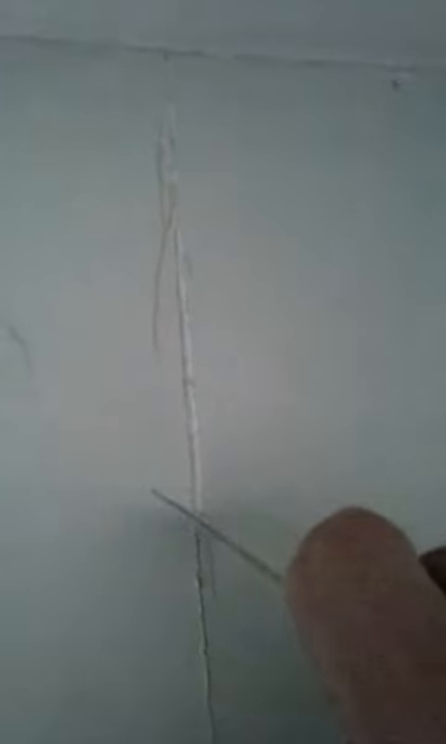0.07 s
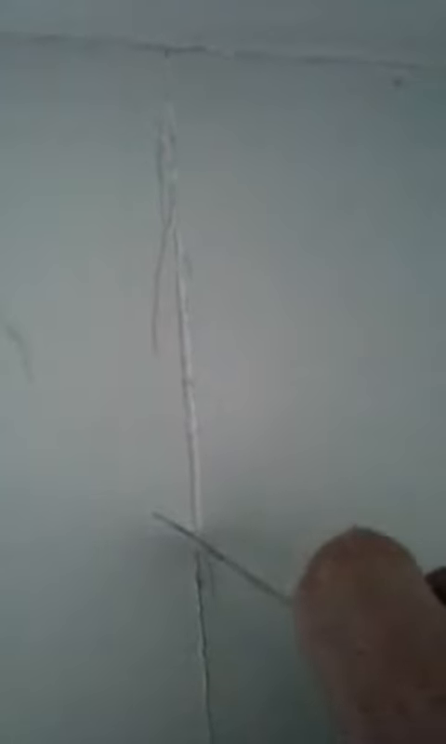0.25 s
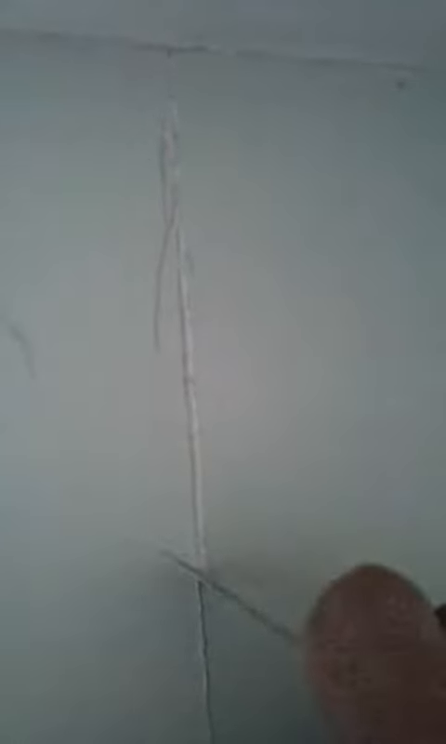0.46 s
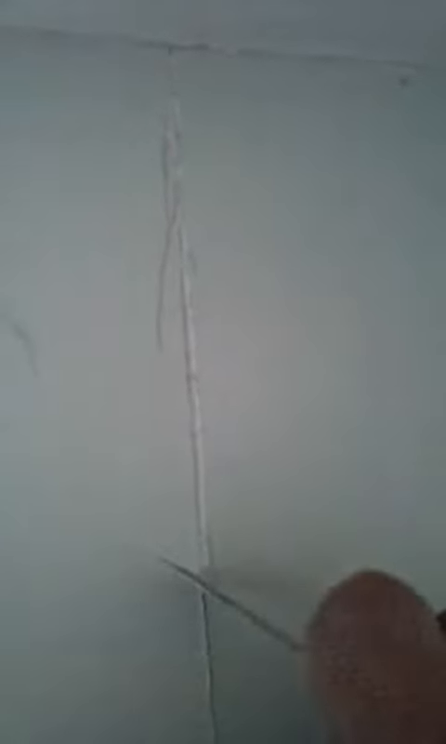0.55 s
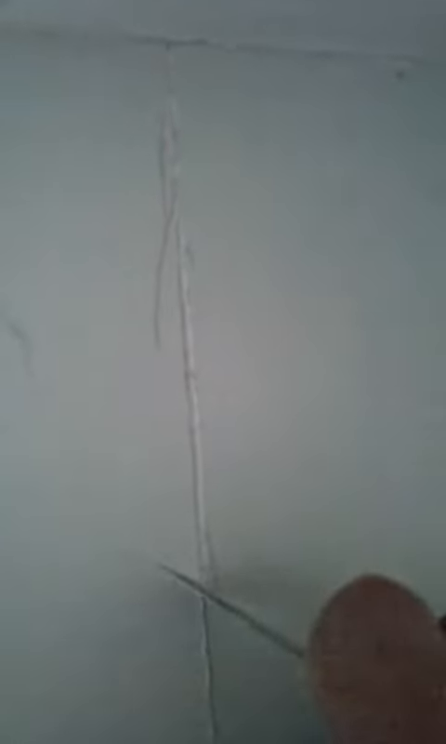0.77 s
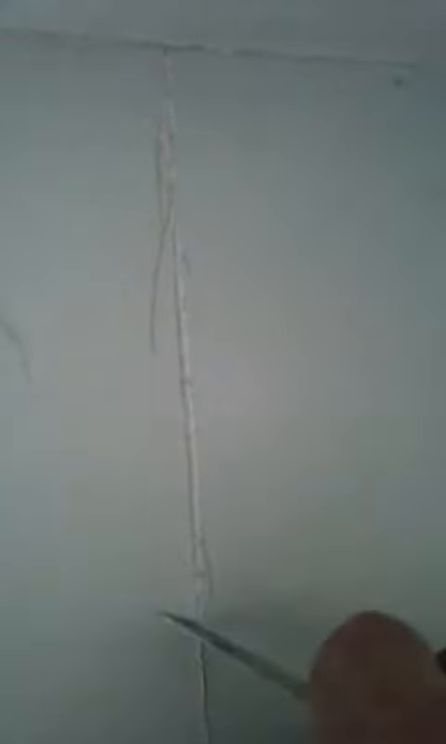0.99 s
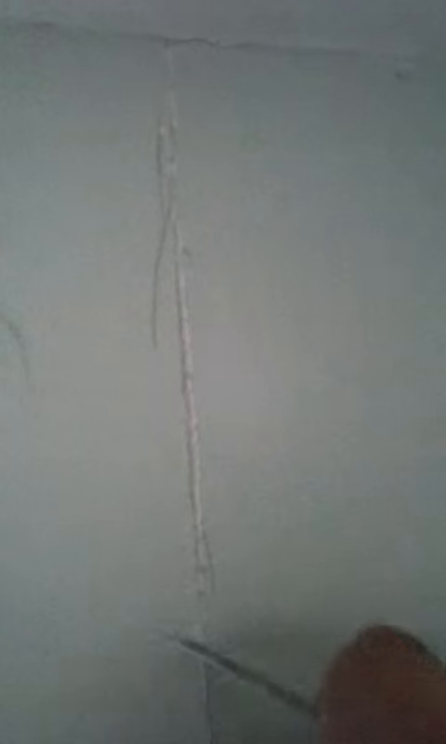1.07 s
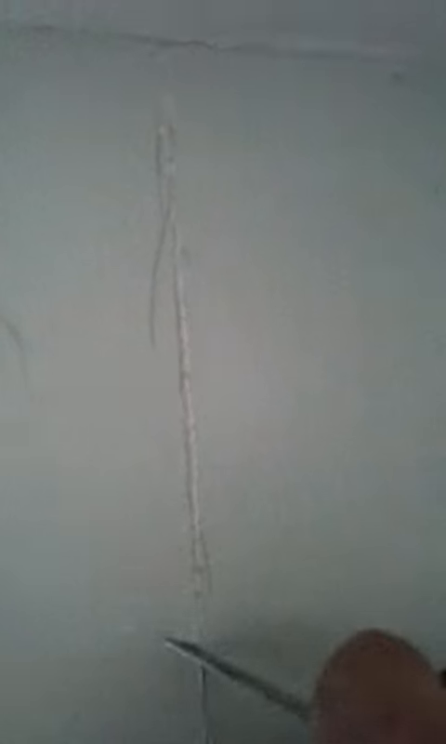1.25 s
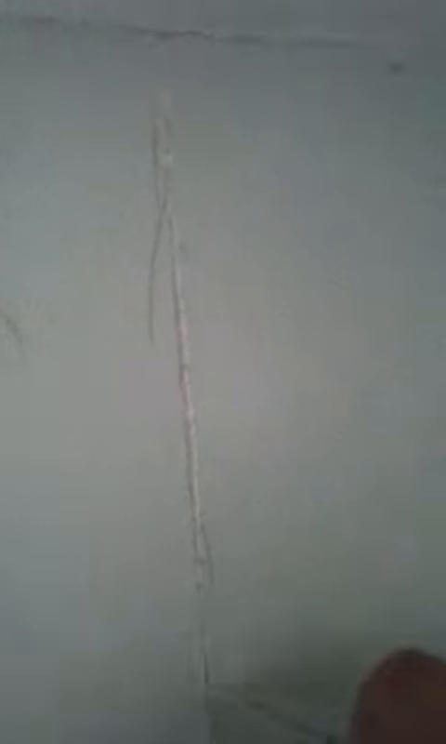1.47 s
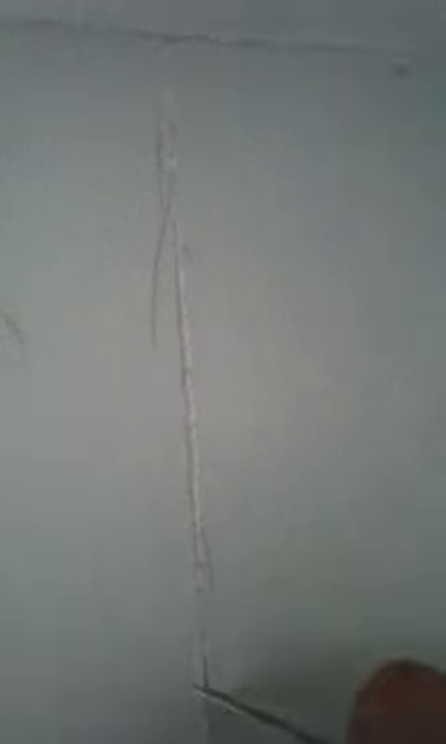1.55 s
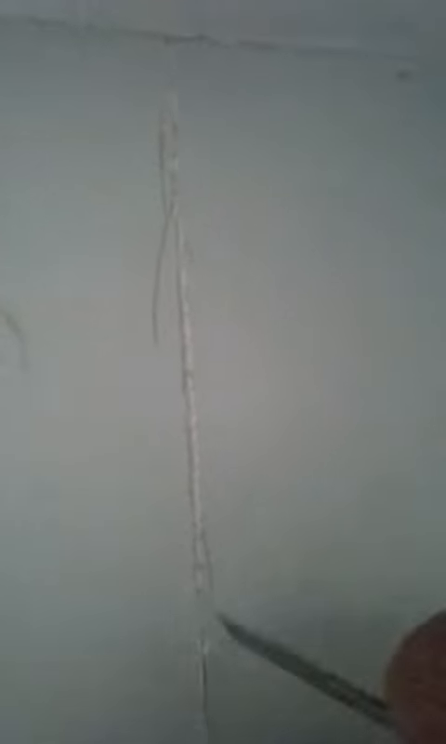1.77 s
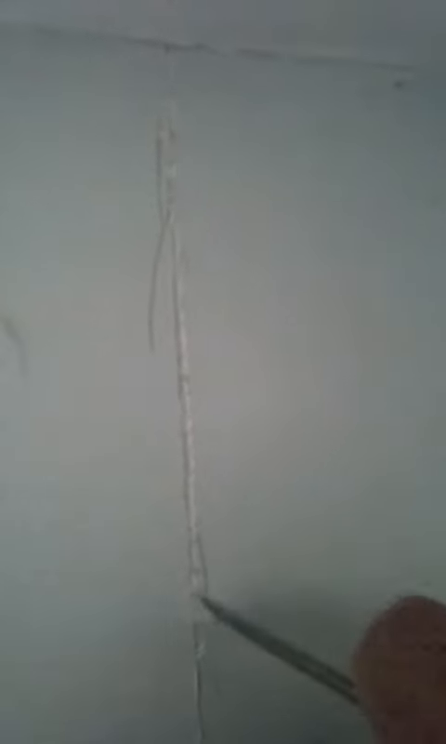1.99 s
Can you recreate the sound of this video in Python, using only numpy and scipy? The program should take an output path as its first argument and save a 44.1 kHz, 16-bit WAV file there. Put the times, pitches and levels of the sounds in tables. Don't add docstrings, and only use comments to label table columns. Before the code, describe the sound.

A steel putty knife gouges a plaster wall crack in short, gritty, snapping bursts

```python
import sys
import numpy as np
from scipy import signal
from scipy.fft import rfft, irfft
from scipy.io import wavfile
from scipy.ndimage import uniform_filter1d

SR = 44100
rng = np.random.default_rng(int(sys.argv[2]) if len(sys.argv) > 2 else 0)


def unload_wav(signal):
    wavfile.write(
        sys.argv[1],
        SR,
        np.round(np.clip(np.atleast_2d(signal).T, -1, 1) * 32767).astype(np.int16),
    )


def magnitude_from_level(level_db):
    exponent = np.asarray(level_db, float) / 20
    return 10 ** exponent


N = 88200

# [f/Hz, density/dB per Hz]
AIR_SPECTRUM = [(40, 8.5), (110, 4.5), (300, -11.5), (1000, -12.5), (4000, -24.5), (6500, -25),
                (10000, -10.5), (16000, -15)]
# [t/s, level/dB]
AIR_LEVEL = [(0, -66.5), (.3, -57), (1.5, -56), (2, -59.5)]
# [f/Hz, width/Hz, level/dB]
DRONE_MODES = [(373, 60, 2), (890, 97, 0.5), (1100, 80, -7)]
# [t/s, level/dB]
DRONE_LEVEL = [(1.0, -90), (1.5, -59.5), (2, -70)]
# [t/s, level/dB, f/Hz]
KNOCKS = [
    (1.40, -53, 925),
    (1.57, -53.5, 904),
    (1.675, -53, 886),
    (1.775, -54.5, 880),
    (1.872, -58.5, 890),
    (1.95, -49.5, 1100),
]
# [delay t/s, level/dB]
SLAPS = [(0.0137, -11.5), (0.0178, -23), (.029, -25), (.038, -20)]
# [f/Hz, level/dB]
SLAP_COLOUR = [(300, -1), (2400, 0), (5000, -2.5), (8500, -1), (12000, -3.5)]
# [f/Hz, t60/s]
TAIL_DECAY = [(80, 1.0), (210, 0.27), (560, 0.96), (1470, 0.69), (3880, 0.56), (7000, 0.44), (10200, 0.32),
              (15000, 0.11)]
# [f/Hz, level/dB]
TAIL_COLOUR = [(60, 5.5), (200, 6.5), (440, 0), (600, -2.5), (1000, -3), (3500, -3), (6000, 1), (12000, -1)]
# [t/s, level/dB]
BOOMS = [
    (.03, -63),
    (0.247, -42.5),
    (0.457, -38.5),
    (0.589, -46),
    (0.754, -81),
    (0.958, -38),
    (1.165, -31),
    (1.502, -36.5),
]
# [start t/s, length t/s, level/dB, edge ring f/Hz, wall level/dB]
DRAGS = [
    (0.16, 0.012, -49.5, 3180, -37),
    (0.404, 0.027, -55, 2974, -3),
    (0.901, .03, -39.5, 2900, -27.5),
    (1.468, .10, -33.5, 2940, -12),
]
# [t/s, strength level/dB, length t/s, loudest blade ring f/Hz, blade and wall level/dB]
BREAKS = [(.1800, -24.5, 0.009, 2940, 8), (.1840, -17.5, 0.0074, 3120, 1),
          (0.229, -14.5, 0.0049, 3110, 5.5), (0.242, -23, 0.011, 2760, 1.5),
          (0.373, -37, 0.0015, 6460, -12), (.4290, 1, 0.006, 4444, 2), (0.4557, 1.5, 0.0064, 5516, -1),
          (0.4612, 3.5, 0.0015, 4200, -1), (0.5804, 4, .008, 4200, -0.5), (0.7499, -6.5, 0.0051, 4230, 3.5),
          (0.9047, -22, 0.0025, 3050, 3), (0.912, -23, 0.011, 2670, 3.5), (0.9361, -11, 0.0036, 3150, 8),
          (0.9586, 0, 0.0084, 2610, 3.5), (1.1239, -6.5, 0.0062, 2570, 3.5), (1.1637, 5, 0.0066, 2560, 4),
          (1.1684, 1, 0.0048, 4100, -1.5), (1.483, -33, 0.0032, 1550, 12), (1.489, -29, 0.0037, 3000, 3.5),
          (1.6966, -34, 0.00077, 5120, -13.5), (1.7185, -36, .005, 1844, 12),
          (1.8566, -41, 0.0018, 2580, -9)]
# [f/Hz, level/dB]
GRIT_COLOUR = [(150, -37.5), (600, -29.5), (2000, -10.5), (6000, -8.5), (10000, -9.5), (13000, -13),
               (16000, 2)]
# [f/Hz, width/Hz, level/dB]
BLADE_MODES = [(801, 580, -6.5), (1690, 190, -8.5), (2556, 160, -4.5), (3150, 110, -9), (4200, 127, -8),
               (5462, 125, -7), (7170, 1000, -1.5)]
# [f/Hz, width/Hz, level/dB]
WALL_MODES = [(98.2, 27, -7), (200.7, 31, -12), (353, 66, 1)]
# [f/Hz, width/Hz, level/dB]
SHEET_LOW = [(185, 71, -29.5), (328, 49, -24), (443.4, 67, -26.5)]
# [f/Hz, width/Hz, level/dB]
SHEET_HIGH = [(900, 250, -21), (1150, 200, -22), (1700, 400, -20), (2420, 220, -13), (3400, 500, -22),
              (5500, 400, -12)]


def read(points, x, warp=np.log1p):
    at, value = np.transpose(points)
    return np.interp(warp(x), warp(at), value)


def evened(x):
    return x / np.sqrt(np.mean(x ** 2) + 1e-20)


def add(mix, s, sound):
    part = mix[round(s * SR):][:len(sound)]
    part += sound[:len(part)]


def resonate(x, hz, width):
    r = np.exp(-np.pi * width / SR)
    pole = r * np.exp(2j * np.pi * hz / SR)
    return 2 * signal.lfilter([1 - r], [1, -pole], x).real


def colour(x, points):
    gain = magnitude_from_level(read(points, np.fft.rfftfreq(len(x), 1 / SR)))
    return irfft(rfft(x) * gain, len(x))


def clicks(draws, per_s, spread_db):
    happens = draws[0] < per_s / SR
    size = magnitude_from_level(-spread_db * np.log(np.clip(draws[1], .01, 1)))
    return happens * size * np.sign(draws[2] - .5)


def modes(x, table, bends=1, luck_db=0):
    hz, width, db = np.transpose(table)
    out = 0
    for k, (f, w, level_db) in enumerate(zip(hz * bends, width, db + luck_db)):
        equal_energy = np.sqrt(SR / w / 4)
        out = out + (-1) ** k * magnitude_from_level(level_db) * resonate(x, f, w) * equal_energy
    return out


def dust():
    clumps = evened(uniform_filter1d(rng.standard_normal(N), size=250))
    grains = clicks(rng.random((3, N)), per_s=3500, spread_db=2.2) * magnitude_from_level(3 * clumps)
    high_pass = signal.butter(4, 7500, "high", fs=SR, output="sos")
    return evened(signal.sosfilt(high_pass, grains))


def drone():
    level_db = read(DRONE_LEVEL, np.arange(N) / SR, warp=np.asarray)
    hum = modes(modes(rng.standard_normal(N), DRONE_MODES), DRONE_MODES)
    return magnitude_from_level(level_db) * evened(hum)


def air():
    hush = evened(colour(rng.standard_normal(N), AIR_SPECTRUM))
    level_db = read(AIR_LEVEL, np.arange(N) / SR, warp=np.asarray)
    return magnitude_from_level(level_db) * (hush + dust()) + drone()


def knocks():
    length_s, width_hz = .07, 80
    out, t = np.zeros(N), np.arange(0, length_s, 1 / SR)
    noises = rng.standard_normal((len(KNOCKS), 8192))
    for (s, db, hz), noise in zip(KNOCKS, noises):
        ring = resonate(resonate(noise, hz, width_hz), hz, width_hz)
        ring = evened(ring[2048:][:len(t)])
        add(out, s, magnitude_from_level(db - 11) * np.sin(np.pi * t / length_s) * ring)
    return out


def room(x):
    tail_db, build_s = -9.5, 0.0069
    hz, t, z = signal.stft(rng.standard_normal(SR), SR, nperseg=256)
    fade = magnitude_from_level(-60 * t / read(TAIL_DECAY, hz)[:, None])
    tail = signal.istft(z * fade, SR, nperseg=256)[1][:SR]
    build = 1 - np.exp(-(np.arange(SR) / SR / build_s) ** 2)
    tail = colour(tail * build, TAIL_COLOUR)
    return signal.fftconvolve(x, magnitude_from_level(tail_db) * tail / np.linalg.norm(tail))[:N]


def slaps(x):
    scatter_s = .0016
    t = np.arange(256) / SR
    taps = np.zeros(4096)
    smears = rng.standard_normal((len(SLAPS), 256)) * t * np.exp(-t / scatter_s * 2)
    for (s, db), smear in zip(SLAPS, smears):
        add(taps, s, magnitude_from_level(db) * smear / np.linalg.norm(smear))
    return signal.oaconvolve(x, colour(taps, SLAP_COLOUR))[:N]


def booms():
    from_hz, panel_hz, width_hz = 198.3, 100.3, 28
    glide_s, rise_s, t60_s = .02, 0.024, 0.23
    out, t = np.zeros(N), np.arange(SR // 3) / SR
    pitch = panel_hz + (from_hz - panel_hz) * np.exp(-t / glide_s)
    tone = np.sin(2 * np.pi * np.cumsum(pitch) / SR)
    swell = 1 - np.exp(-(t / rise_s) ** 2)
    for (s, db), noise in zip(BOOMS, rng.standard_normal((len(BOOMS), len(t)))):
        fuzz = evened(resonate(noise, panel_hz * 0.79, width_hz * 3))
        add(out, s, magnitude_from_level(db + 7 - 60 * t / t60_s) * swell * (tone + 0.81 * fuzz))
    return out


def drags():
    ring_db, ring_width_hz, peak_at = -4.5, 660, 0.39
    out = np.zeros(N)
    draws = rng.random((len(DRAGS), 3, 8192))
    for (s, length, db, hz, wall_db), d in zip(DRAGS, draws):
        u = np.clip(np.arange(8192) / SR / length, 0, 1)
        swell = np.sin(np.pi * u ** (np.log(.5) / np.log(peak_at)))
        grit = evened(clicks(d, per_s=9000, spread_db=1.2))
        edge = evened(resonate(resonate(grit, hz, ring_width_hz), hz, ring_width_hz))
        body = 0.69 * evened(colour(grit, GRIT_COLOUR)) + magnitude_from_level(ring_db) * edge
        body = body + magnitude_from_level(wall_db) * evened(modes(grit, WALL_MODES))
        add(out, s, magnitude_from_level(db) * body * swell)
    return out


def breaks():
    lead_s, rise_s, fall_s, sag_db = .001, 0.00074, 0.0004, -12.5
    blade_level_db, bend, luck_db, ring_late = -16.5, .02, 4.5, 0.44
    loud_width_hz, loud_db = 355, -14
    wall_level_db, wall_push = -22, 0.7
    near, far = np.zeros(N), np.zeros((3, N))
    t = np.arange(4096) / SR - lead_s
    draws = rng.random((len(BREAKS), 3, len(t)))
    luck = rng.standard_normal((len(BREAKS), 2, len(BLADE_MODES)))
    for k, ((s, db, length, ring_hz, shake_db), d, l) in enumerate(zip(BREAKS, draws, luck)):
        edges = np.exp(np.minimum(t, 0) / rise_s * 3 - np.maximum(t - length, 0) / fall_s)
        shape = edges * magnitude_from_level(sag_db * np.clip(t / length, 0, 1))
        cracks = evened(clicks(d, per_s=12000, spread_db=5)) * shape
        blow = np.linalg.norm(shape) * (np.arange(len(t)) == round(lead_s * SR))
        late = np.roll(blow, round(ring_late * length * SR))

        rings = modes(0.9 * cracks + .5 * late, BLADE_MODES, 1 + bend * l[0], luck_db * l[1])
        loud_drive = .3 * cracks + resonate(late, ring_hz, loud_width_hz * 2)
        loud_ring = modes(loud_drive, [(ring_hz, loud_width_hz, loud_db)])
        blade = magnitude_from_level(shake_db) * (magnitude_from_level(blade_level_db) * rings + loud_ring)
        wall = magnitude_from_level(wall_level_db + shake_db) * modes(blow * wall_push, WALL_MODES)
        add(near, s - lead_s, magnitude_from_level(db) * (colour(cracks, GRIT_COLOUR) + blade + wall))

        sheet = modes(blow, SHEET_HIGH) + magnitude_from_level(shake_db) * modes(blow, SHEET_LOW)
        add(far[k % 3], s - lead_s, magnitude_from_level(db) * (colour(blow, GRIT_COLOUR) + sheet))
    return near, far


def scene():
    near, far = breaks()
    soft = drags() + knocks()
    tails = sum(room(part) for part in far)
    soft_tail = magnitude_from_level(-12) * room(soft)
    echoes = slaps(far.sum(axis=0))
    return (near + soft + tails + soft_tail + echoes + booms() + air())[None]


def roll_off(x):
    return signal.sosfilt(signal.butter(12, 16640, fs=SR, output="sos"), x)


def record(dry):
    port = magnitude_from_level(16) * resonate(dry[0], hz=8250, width=535)
    shoulder = magnitude_from_level(2) * resonate(dry[0], hz=8700, width=2000)
    x = dry[0] + port + shoulder
    x = signal.sosfilt(signal.butter(3, 75, "high", fs=SR, output="sos"), x)
    ceiling = magnitude_from_level(-0.26)
    x = x / (1 + abs(x / ceiling) ** 6) ** (1 / 6)
    treble_limit = signal.firwin(255, 15900, window=("kaiser", 6), fs=SR)
    x = signal.oaconvolve(x, treble_limit, "same")
    mix = np.clip(x, -1, 1)[None]
    return roll_off(mix)


dry = scene()
out = record(dry)
unload_wav(out)
```